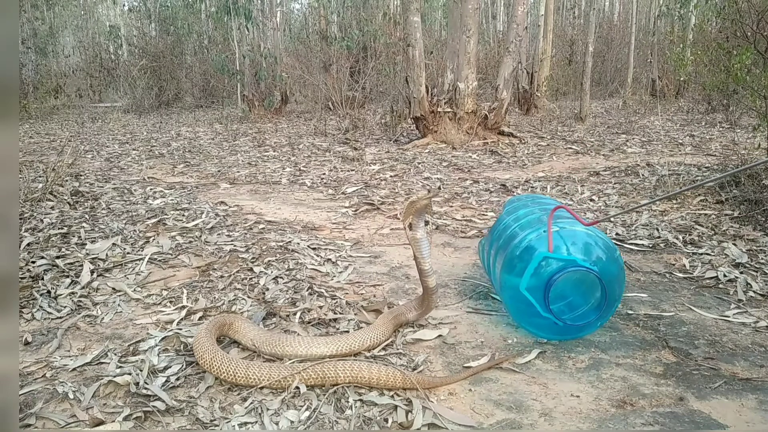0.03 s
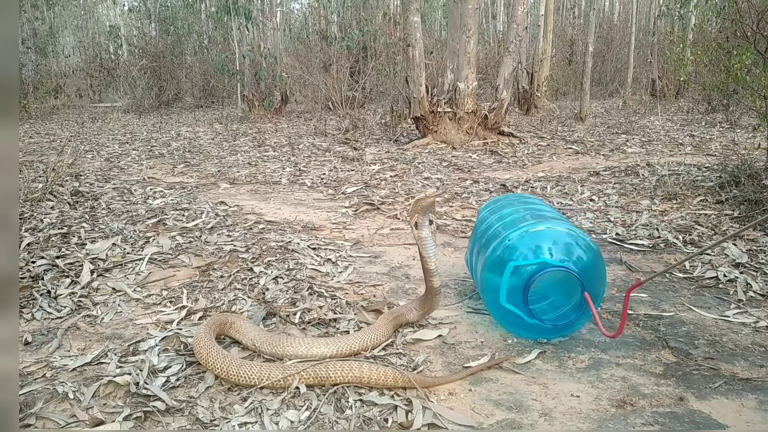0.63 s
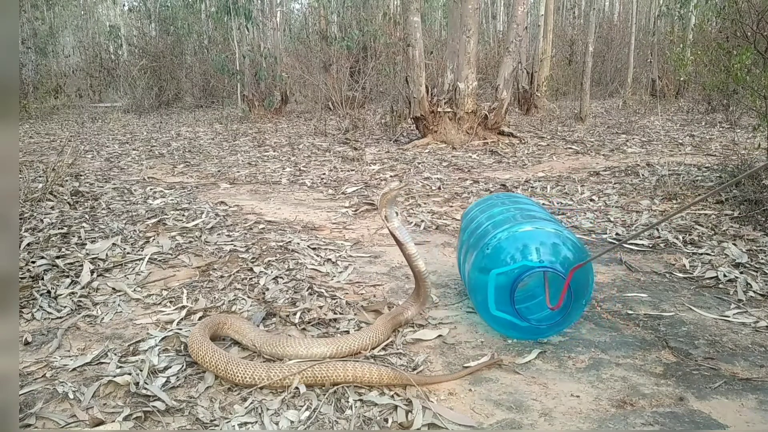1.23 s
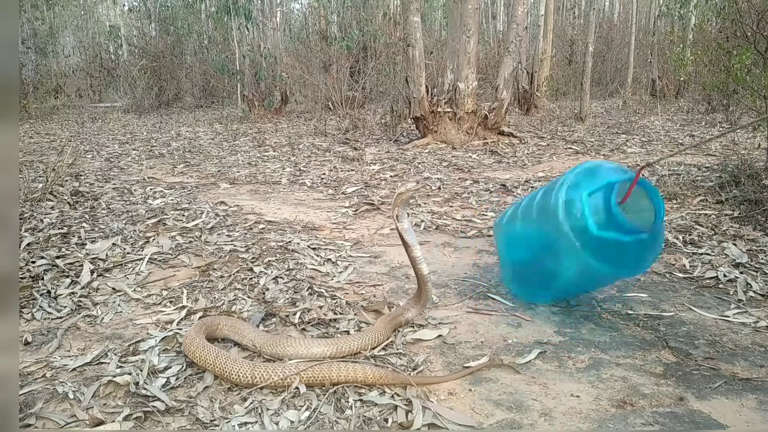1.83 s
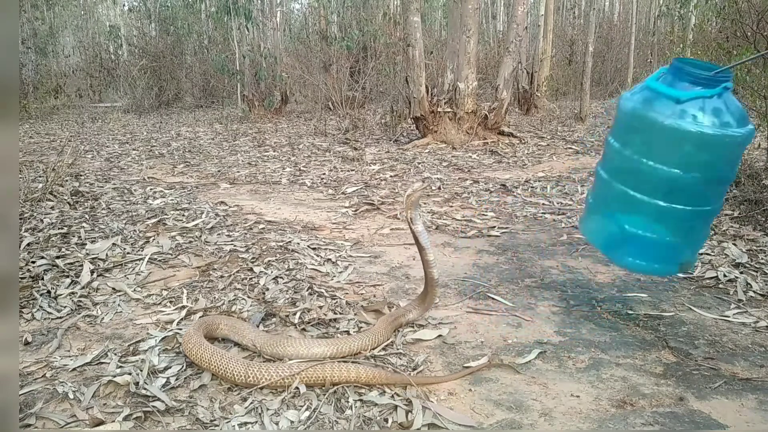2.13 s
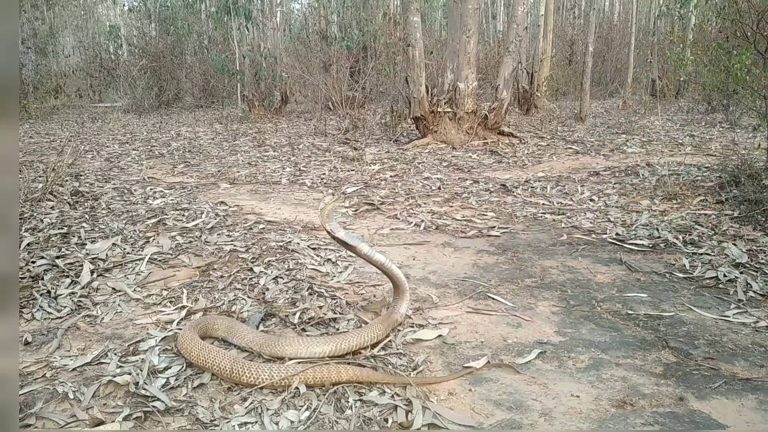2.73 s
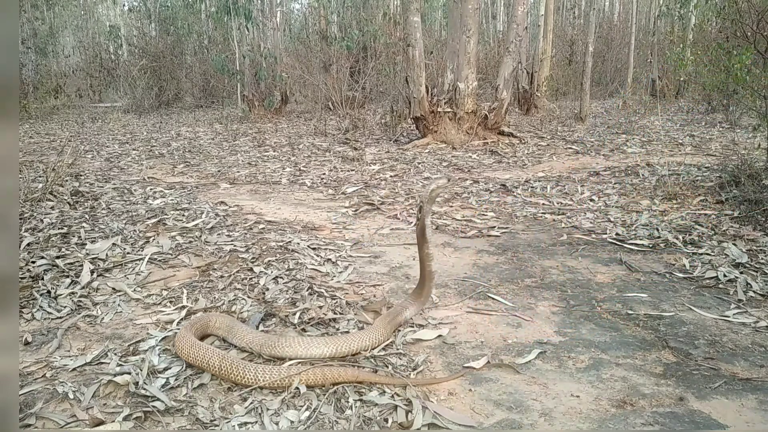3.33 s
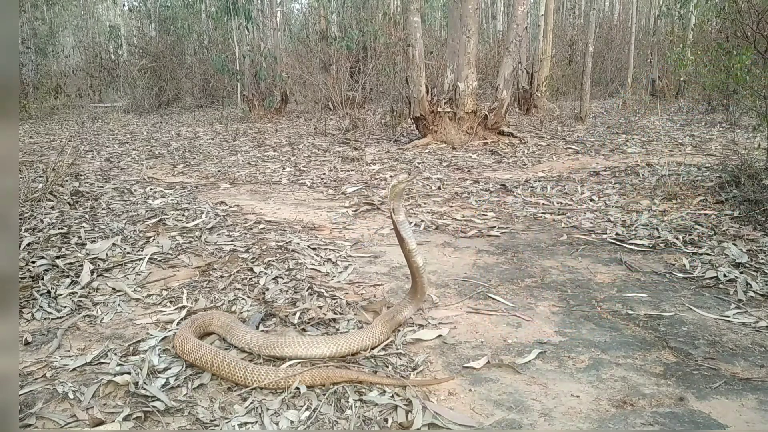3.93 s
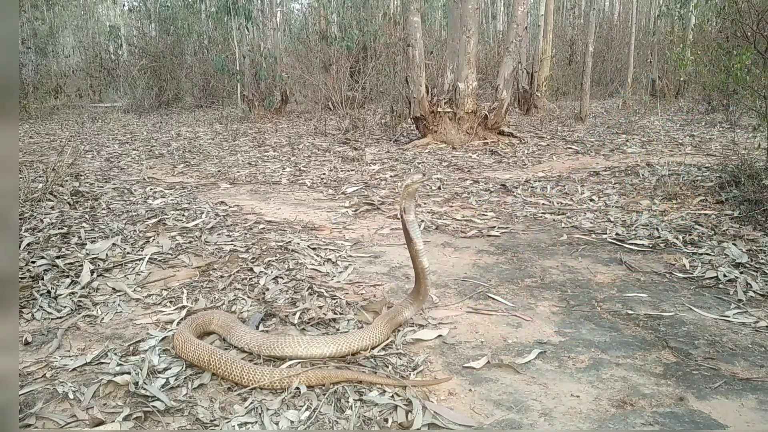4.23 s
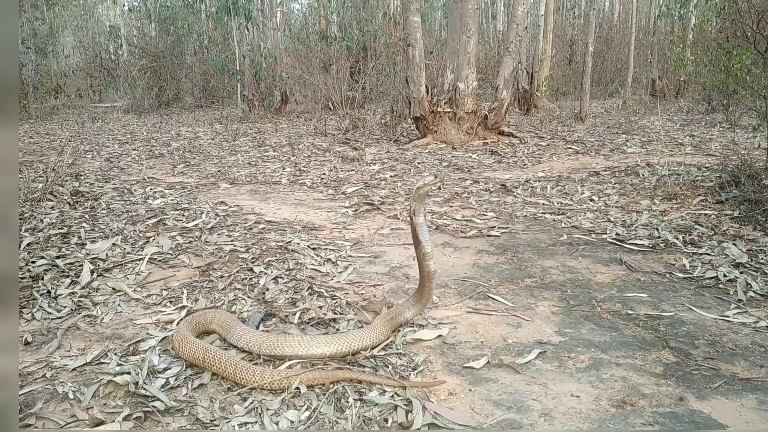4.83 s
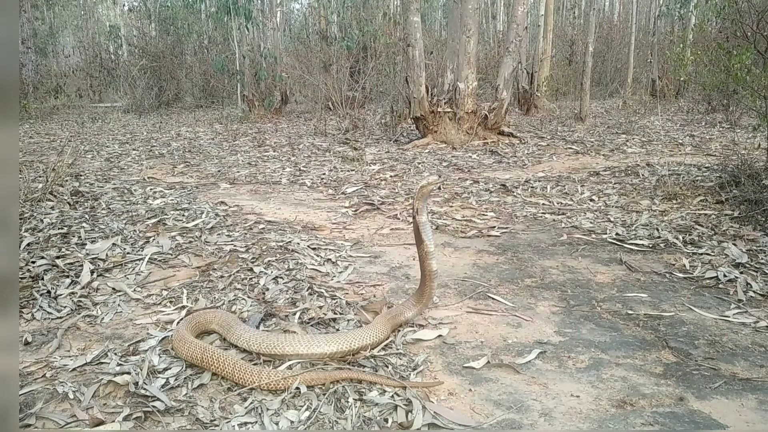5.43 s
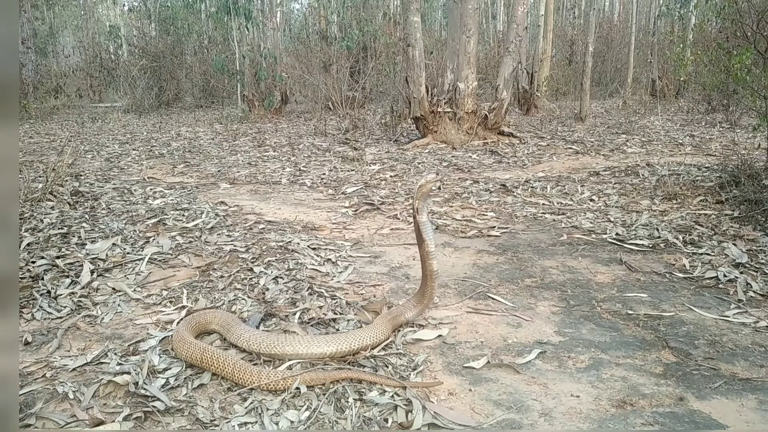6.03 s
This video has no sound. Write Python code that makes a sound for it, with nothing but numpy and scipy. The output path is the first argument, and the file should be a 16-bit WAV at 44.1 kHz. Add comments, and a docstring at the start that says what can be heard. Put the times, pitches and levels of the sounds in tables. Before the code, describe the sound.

A large empty plastic jug gives hollow knocks and light rasps as a stick catches it, with a few dry leaf snaps around it. Then a snake hisses twice, briefly, the second breath hollower, amid crackling leaves slightly to the left. The jug bumps down and scrapes over the ground in booming lurches, leaving only soft rustling. Still woodland air with a faint low hum lies behind everything.

```python
"""Dry leaves snap, then a big empty plastic water jug gives hollow knocks as a hooked stick bumps it
and lifts it away. A cobra hisses twice by forcing air through its throat, and leaves rustle as they
slide over each other. The jug is set down to one side and dragged, juddering as its rim sticks and
slips. Behind it all, the still air of a wood carries a faint low hum and a thin high hiss."""
import sys
import numpy as np
from scipy import signal
from scipy.fft import rfft, irfft, next_fast_len
from scipy.io import wavfile
from scipy.ndimage import uniform_filter1d

SR = 44100
rng = np.random.default_rng(int(sys.argv[2]) if len(sys.argv) > 2 else 0)


def persist_wave(psi):
    """Save psi, clipped to +-1, as 16-bit WAV."""
    counts = np.round(np.clip(psi, -1, 1) * 32767).astype(np.int16)
    wavfile.write(sys.argv[1], SR, np.atleast_2d(counts).T)


N = 267687
TIME = np.arange(N) / SR


def knocks():
    """Each blow makes the jug ring and its wall crack briefly; the spot that is hit shapes the tone."""
    # Blows on the jug; the struck spot boosts one pitch. Columns: start_s, level_db, low_wall_db,
    # air_boom_db, brightness_db, tick_db, spot_pitch_hz, spot_boost_db, left_minus_right_db
    blows = [ (0.126, -52, 13.5, 14, 2, -2, 1205, 10.5, 1), (.333, -62.5, 2, 15.5, 7, 16, 1580, 6, 2),
             (0.373, -60, 20.5, 21, -5, -8, 111, -4, 1), (.863, -33.5, -9, -6, 0.5, -13, 594, 7.5, -1),
             (0.978, -55.5, -15, 4, -2, 0, 1340, 14, 3), (1.190, -23.5, 0, 5, 5.5, -15.5, 527, 8, -0.5),
             (1.206, -38.5, -19, -22, 7.5, 7.5, 916, 17, 2),
             (1.490, -31.5, 0.5, -4, 6, -1.5, 1360, 6.5, -2), (1.537, -40, -4, 11.5, 17, -7.5, 404, 4, 0.5),
             (1.596, -46.5, 10.5, 6, 6, -14, 1190, 6.5, 1), (1.64, -50, -1, 12, -1, -16, 1130, 9.5, 0.5),
             (1.736, -52.5, 5, 7, 1, 9, 1170, 15, 4), (1.774, -49, -3, 9.5, 3, -10, 1570, 12, 0.5),
             (1.831, -51.5, 6, -14, 9, 16, 1590, 18.5, 0.5), (1.853, -56, 11, 19.5, -17, 22, 366, 14, 2),
             (2.119, -37.5, -22, -24, 3, -3, 1010, 24, 3.5), (2.120, -23, -6, 3, -1, -2, 396, 9, 0),
             (3.136, -47, 1, 8, 1, 11, 343, 6, 2), (4.014, -32.5, 4, -6, 2, 7.5, 634, -3.5, 0.5),
             (4.034, -44, -21, 5.5, 9, -7, 374, 12, 7), (4.245, -39.5, 14, 20, 6, 6.5, 332, 14, 2.5),
             (4.301, -44.5, -8, -11, 8.5, 1, 855, -5, 3), (4.327, -49, -4, -8, 10, -3, 402, -2, 2),
             (4.907, -39.5, -10, -8, -12.5, -12, 650, -7, 8.5), (5.097, -68, -6, 6, 28, -2, 302, 8, -1)]
    # The wall's crowded upper tones, played as bands of noise: pitch_hz, level_db, fade_60db_s
    crack = [(295, 0.5, 0.21), (670, -20.5, 0.13), (1240, -8.5, 0.056), (2230, -20, 0.13),
             (3380, -11, 0.13), (5540, -20, 0.028), (8540, -14, 0.13), (13300, -31, 0.017)]
    crack = np.array(crack)
    out, t = np.zeros((2, N)), np.arange(SR // 2) / SR
    centres = 350 * 2 ** (np.arange(11) / 2)  # half an octave apart
    bands = [signal.butter(2, [hz / 2 ** .25, hz * 2 ** .25], "band", fs=SR, output="sos")
             for hz in centres]
    for start_s, db, wall_db, boom_db, bright_db, tick_db, spot_hz, spot_db, pan_db in blows:
        tone = [(110, wall_db), (160, boom_db), (300, 0), (750, 0), (1500, bright_db), (6000, tick_db)]
        drive = lambda hz: at(hz, tone) + 0.96 * spot_db * np.exp(-(np.log2(hz / spot_hz) / 0.36) ** 2)
        sound = jug_ring(t, drive, scatter_db=2.0, build_cycles=0.75, phase_blur=1.25) * np.ones((2, 1))
        sound += dent(t, spot_hz, db=1 + spot_db, cycles=26.0)
        for hz, band in zip(centres, bands):
            middle, side = unit(signal.sosfilt(band, rng.standard_normal((2, len(t)))))
            band_db, fade_s = at(hz, crack[:, :2]), at(hz, crack[:, ::2])
            fade = undb(band_db + drive(hz) - 60 * t / fade_s)
            width = min(0.77 + hz / 6000, 1)
            sound += fade * (middle + width * side * np.array([[1], [-1]]))
        add(out, start_s, sound * undb(db) * pan(pan_db))
    return out


def jug_ring(t, drive, scatter_db, build_cycles, phase_blur):
    """The jug rings: low tones take a moment to build, and higher ones start more out of step."""
    # Natural tones of the wall and the air inside: pitch_hz, level_db, fade_60db_s
    jug_tones = [(110.8, 4, 0.38), (160.1, 2.5, 0.35), (201.5, -8.5, 0.27), (254.3, -5.5, 0.22),
                 (296.5, -8, 0.32), (325, -8.5, 0.2), (379.7, -0.5, 0.13), (414, 2, 0.13), (427, -3, 0.072),
                 (508.6, -10, 0.21), (573, -4, 0.059), (622, -2.5, 0.081), (694, 0, 0.081),
                 (798.6, -8.5, 0.16), (901, -12.5, 0.18), (922, -25, 0.27), (1044, -14, 0.047),
                 (1276, -24, 0.11), (1375, -19.5, 0.14), (1604, -12, 0.032), (1820, -5.5, 0.019)]
    hz, db, fade_s = np.transpose(jug_tones)[:, :, None]
    chance = rng.standard_normal((len(jug_tones), 3, 1))
    gain = undb(db + drive(hz) + scatter_db * chance[:, 0])
    build_up = 1 - np.exp(-t * hz / build_cycles)
    phase = 2 * np.pi * hz * (1 + 0.0028 * chance[:, 1]) * t + phase_blur * hz / 700 * chance[:, 2]
    return np.sum(gain * build_up * undb(-60 * t / fade_s) * np.sin(phase), axis=0)


def dent(t, hz, db, cycles):
    """The struck spot springs back: a quickly fading tone with a weaker, higher one on top."""
    overtone = 0.06 * np.sin(2 * np.pi * 2.77 * hz * t) * undb(-30 * t * hz / cycles)
    return (np.sin(2 * np.pi * hz * t) + overtone) * undb(db - 60 * t * hz / cycles)


def drag(belly_db, wall_db, pan_db):
    """The dragged jug moves in lurches; each booms in its belly and rasps in its wall."""
    # How hard the rim shakes the belly: pitch_hz, gain_db
    belly_drive = [(110, -7), (160, -0.5), (200, -29), (300, -27.5)]
    # How hard it shakes the wall: pitch_hz, gain_db
    wall_drive = [(160, -30), (200, -16), (255, 3.5), (298, 8), (380, 0), (425, 2), (520, -10.5),
                  (700, -21), (820, -21), (1000, -35), (1400, -2.5), (2000, -9)]
    # Lurches over the ground: peak_at_s, hold_s, boom_db, rasp_db
    lurches = [(4.279, 0.062, -35, -30), (4.386, 0.031, -41, -34.5), (4.47, 0.054, -36.5, -38.5),
               (4.603, 0.034, -39, -44), (4.689, 0.059, -44, -41.5), (4.897, 0.021, -38.5, -37.5),
               (4.993, 0.08, -36.5, -47), (5.103, 0.0069, -45, -40.5), (5.195, .02, -47.5, -61)]
    belly = judder(belly_drive, slips_per_s=40, uneven_db=4, damping_db_per_s=13)
    wall = judder(wall_drive, slips_per_s=52, uneven_db=3.5, damping_db_per_s=58)
    force = np.array([gesture(peak_at_s, 0.026, hold_s, db=0, sag_db_per_s=61, fade_db_per_s=204)
                      for peak_at_s, hold_s, _, _ in lurches])
    gains = undb(np.array(lurches)[:, 2:]).T
    boom, rasp = np.sqrt(gains ** 2 @ force ** 2)  # overlapping lurches add their power
    return (belly * boom * undb(belly_db) + wall * rasp * undb(wall_db)) * pan(pan_db)


def judder(drive, slips_per_s, uneven_db, damping_db_per_s):
    """The rim sticks and slips; every slip rings the jug again, and the loudness is evened out."""
    out, t = np.zeros(N), np.arange(SR // 3) / SR
    for _ in range(3):  # three points of the rim touch the ground
        slips = (rng.random(N) < slips_per_s / SR) * undb(uneven_db * rng.standard_normal(N))
        ring = jug_ring(t, lambda hz: at(hz, drive), scatter_db=0.0, build_cycles=0.87, phase_blur=2.17)
        out += signal.fftconvolve(slips, ring * undb(-damping_db_per_s * t))[:N]
    power = uniform_filter1d(out ** 2, size=1500)
    return out / np.sqrt(power + 0.034 * power.mean())


def hook_scrape(db, grit_db):
    """The hook rubs over the plastic in short strokes: a fine rasp whose grip wavers quickly."""
    # Strokes along the jug's neck: peak_at_s, rise_s, hold_s, level_db
    strokes = [(1.0, .1, 0.092, -57), (1.378, .03, 0.014, -57), (1.447, 0.079, 0.033, -50),
               (1.58, 0.058, 0.11, -61.5), (1.70, 0.033, .03, -54), (1.841, 0.031, 0.0054, -53)]
    # Tone of the rubbing: pitch_hz, level_db
    rub_tone = [(300, 4), (800, -6.5), (1300, -3.5), (1800, -4.5), (2400, -8), (3200, -10), (4200, -14),
                (6000, -26), (14000, -23)]
    rub = rng.standard_normal(N) + .5 * rng.standard_normal((2, N))
    power = sum(gesture(*stroke, sag_db_per_s=30, fade_db_per_s=293) ** 2 for stroke in strokes)
    rasp = unit(colour(rub, rub_tone) * undb(grit_db * wobble(200)))
    return rasp * np.sqrt(power) * undb(db)


def snake_hisses(db, flutter_db):
    """The snake forces air out of its windpipe: a fluttering rush over the hollow ring of its throat."""
    # Breaths: peak_at_s, rise_s, hold_s, level_db, throat_db
    breaths = [(2.689, 0.052, .055, -43.5, -34), (3.69, 0.099, 0.12, -43, -9)]
    # Tone of the rushing air: pitch_hz, level_db
    rush_tone = [(150, -14), (600, -5), (1000, -5.5), (2500, -7.5), (4600, -0.5), (5200, -8), (7000, -2.5),
                 (9000, 2), (10200, -1.5), (11200, -6), (14500, -11.5)]
    # Tone of the hollow throat: pitch_hz, level_db
    throat_tone = [(150, -25), (280, -3), (400, 11), (500, 4), (700, -43), (1500, -60)]
    air = from_left(lambda: rng.standard_normal(N), lag_ms=0.38, blur_hz=2600, shade_db=-8.5)
    rush, throat = unit(colour(air, rush_tone)), unit(colour(air, throat_tone))
    bursts = sum(gesture(*breath, sag_db_per_s=31, fade_db_per_s=213) * (rush + undb(throat_db) * throat)
                 for *breath, throat_db in breaths)
    return bursts * undb(db + flutter_db * wobble(72))


def leaf_rustle(leaf_tone, db, cracks_per_s, spread_db, scrape_db, flutter_db):
    """Dry leaves slide over each other: many tiny cracks of unequal size mixed with a smooth scrape."""
    # Stirs of the leaves: peak_at_s, rise_s, hold_s, level_db
    stirs = [(2.885, 0.064, .27, -50.5), (3.029, 0.21, 0.005, -47.5), (3.203, 0.07, 0.02, -44),
             (3.27, .05, 0.052, -53.5), (3.39, 0.049, 0.18, -62.5), (3.87, 0.046, 0.082, -53),
             (4.024, 0.077, 0.013, -46.5), (4.09, .05, 0.18, -59.5), (4.29, 0.061, 0.06, -55),
             (4.448, 0.028, 0.036, -46.5), (4.55, 0.18, 0.11, -49), (4.768, 0.12, 0.0045, -50),
             (4.87, .02, 0.018, -60), (5.004, 0.06, 0.012, -57), (5.14, 0.078, .18, -59.5),
             (5.205, 0.11, 0.027, -55), (5.45, 0.083, .24, -53), (5.89, 0.075, .17, -59.5),
             (6.03, .1, .03, -59)]

    def crackle():
        hits = rng.random(N) < cracks_per_s / SR
        sizes = undb(spread_db * np.minimum(rng.exponential(size=N), 4))
        cracks = unit(hits * sizes * rng.choice([-1, 1], N))
        return cracks + undb(scrape_db) * rng.standard_normal(N)
    rustle = colour(from_left(crackle, lag_ms=0.4476, blur_hz=6350, shade_db=-9.5), leaf_tone)
    power = sum(gesture(*stir, sag_db_per_s=19.5, fade_db_per_s=194) ** 2 for stir in stirs)
    return unit(rustle) * np.sqrt(power) * undb(db + flutter_db * wobble(90))


def snaps(leaf_tone, fade_60db_s):
    """Brittle leaves and twigs break with a dry tick."""
    # Breaks: start_s, level_db, left_minus_right_db
    breaks = [(0.09, -33, 1), (.126, -50, -1), (0.231, -34, 2), (2.037, -41, -4), (2.119, -20, 13.5),
              (2.169, -35, 4), (2.332, -41, 7), (2.943, -27, -4), (3.029, -30, 2), (3.195, -29, 4),
              (3.203, -19, 2), (3.80, -29, 5), (3.901, -23.5, 0), (4.243, -26, 9), (4.357, -33, 2),
              (4.670, -31, 10), (4.712, -27.5, 7.5), (4.828, -31, 5), (5.125, -37, 6), (5.548, -26.5, 10),
              (5.983, -33, 8)]
    out, t = np.zeros((2, N)), np.arange(SR // 20) / SR
    for start_s, db, pan_db in breaks:
        tick = rng.standard_normal((2, len(t))) * undb(db - 60 * t / fade_60db_s)
        add(out, start_s, tick * pan(pan_db))
    return colour(out, leaf_tone)


def woodland():
    """Still air, alike left and right in the bass, with a wavering hum and a thin hiss that fades."""
    # Tone of the still air: pitch_hz, level_db
    air_tone = [(25, -43), (50, 0), (100, 9.5), (150, 11.5), (220, 5.5), (350, 2.5), (500, -7), (900, -17),
                (1500, -13.5), (2700, -13.5), (4500, -19.5), (5300, -22), (8700, -20.5), (14000, -35.5)]
    # Notes of the low hum: pitch_hz, level_db
    hum_notes = [(111, -62.5), (170, -57), (205, -60.5), (256, -67)]
    # Tone of the thin hiss: pitch_hz, level_db
    thin_tone = [(1000, 3.5), (2500, -2.5), (3900, 4), (5300, -8.5), (6800, -9), (7600, 1), (8200, -0.5),
                 (9100, 5), (10400, 1.5), (11000, -6), (11700, -3.5), (14000, -10.5)]
    # How the thin hiss swells and fades: time_s, level_db
    thin_levels = [(0, -56.5), (.5, -56), (1, -53.5), (1.5, -54.5), (1.9, -58.5), (2.25, -62.5),
                   (6.07, -101)]
    side = colour(rng.standard_normal(N), [(200, -31), (600, -0.5), (2000, -0.5), (8000, -3.0)])
    air = unit(colour(rng.standard_normal(N) + side * np.array([[1], [-1]]), air_tone))
    air *= undb(-55.5 + wobble(12))
    hum = np.zeros(N)
    for hz, db in hum_notes:
        gain = undb(db + 2 * wobble(20))
        pitch_hz = hz * (1 + 0.01323 * wobble(9))
        hum += gain * np.sin(2 * np.pi * np.cumsum(pitch_hz) / SR)
    thin = unit(colour(rng.standard_normal((2, N)), thin_tone))
    thin *= swell(thin_levels) * undb(-3.0 + 2.3 * wobble(27.9))
    return air + hum + thin * pan(db=0.5)


def from_left(source, lag_ms, blur_hz, shade_db):
    """A sound from the left reaches the right side late, its treble dulled and scattered on the way."""
    direct, scattered = source(), source()
    hz = np.geomspace(100, 16000, 16)
    alike = 1 / (1 + (hz / blur_hz) ** 2)
    shade = shade_db * np.clip(np.log2(hz / 3500) / 2, 0, 1)
    late = np.interp(TIME - lag_ms / 1000, TIME, direct)
    right = colour(late, np.c_[hz, 10 * np.log10(alike) + shade])
    right += colour(scattered, np.c_[hz, 10 * np.log10(1 - alike) + shade])
    return np.array([direct, right])


def gesture(peak_at_s, rise_s, hold_s, db, sag_db_per_s, fade_db_per_s):
    """Loudness of one movement: it climbs its last 20 dB in rise_s, sags while held, then dies away."""
    t = TIME - peak_at_s
    rise = 20 * np.minimum(t, 0) / max(rise_s, 1 / SR)
    return undb(db + rise - sag_db_per_s * np.clip(t, 0, hold_s) - fade_db_per_s * np.maximum(t - hold_s, 0))


def undb(db):
    """Turn decibels into a gain to multiply by."""
    return 10 ** (np.asarray(db) / 20)


def unit(x):
    """Scale to an average power of one."""
    return x / np.sqrt(np.mean(x ** 2))


def at(hz, points):
    """Read between (pitch_hz, value) points, spaced by octaves."""
    pitches, values = np.transpose(points)
    return np.interp(np.log(np.maximum(hz, 1)), np.log(pitches), values)


def colour(x, points):
    """Shape a sound's tone with (pitch_hz, gain_db) points."""
    size = next_fast_len(N + 4096)
    gain = undb(at(np.fft.rfftfreq(size, 1 / SR), points))
    return irfft(rfft(x, size) * gain, size)[..., :N]


def swell(curve):
    """Smooth gain from (time_s, level_db) rows, silent outside them."""
    s, db = np.transpose(curve)
    return uniform_filter1d(undb(np.interp(TIME, s, db)) * (TIME >= s[0]) * (TIME <= s[-1]), size=300)


def wobble(per_s):
    """A smooth random wander, about one either side of zero."""
    step = max(int(SR / per_s), 1)
    return 1.2 * uniform_filter1d(np.repeat(rng.standard_normal(N // step + 1), step), step)[:N]


def pan(db):
    """Left and right gains; positive db leans left."""
    return undb(np.array([[db], [-db]]) / 2)


def add(out, start_s, sound):
    """Mix a short sound in at start_s."""
    i = max(int(start_s * SR), 0)
    out[:, i:i + sound.shape[-1]] += sound[:, :N - i]


def scene():
    """The jug, the leaves and the snake over the quiet of the wood."""
    # The jug gives off little sound below its lowest tone: pitch_hz, gain_db
    jug_output = [(25, -12), (55, -16), (80, -4.5), (105, 0), (15000, -4)]
    # Tone of dry leaves and twigs: pitch_hz, level_db
    leaf_tone = [(200, -23), (600, -4.5), (1200, -12), (2200, -9.5), (3200, -9), (4500, -4.5), (5100, -11),
                 (6500, -6.5), (8600, -0.5), (10000, -3.5), (11300, -8.5), (14500, -9.5)]
    jug = knocks() + drag(belly_db=2.5, wall_db=2.0, pan_db=2.0) + hook_scrape(db=6.5, grit_db=4.0)
    leaves = leaf_rustle(leaf_tone, db=3.5, cracks_per_s=1600, spread_db=4, scrape_db=5.0, flutter_db=2.5)
    leaves += snaps(leaf_tone, fade_60db_s=0.0099)
    return colour(jug, jug_output) + leaves + snake_hisses(db=4.0, flutter_db=1.04) + woodland()


def record(dry):
    """The right microphone hears little bass; both sides lose the treble above 14400 Hz."""
    # What the right microphone picks up: pitch_hz, gain_db
    right_mic = [(60, -13.5), (220, -13), (380, -12.5), (520, -1), (700, 0.5), (15000, -1)]
    both_sides = np.array([dry[0], colour(dry[1], right_mic)])
    return signal.sosfilt(signal.ellip(10, .2, 70, 14400, fs=SR, output="sos"), both_sides)


dry = scene()
out = record(dry)
persist_wave(out)
```